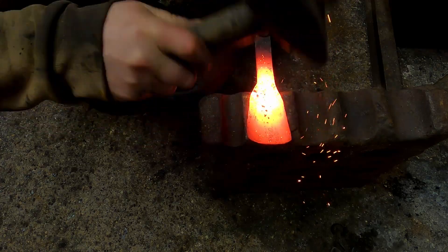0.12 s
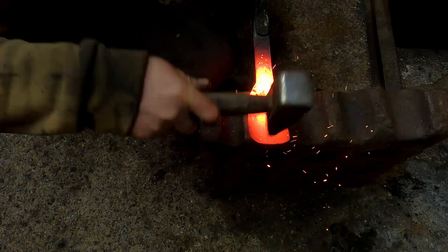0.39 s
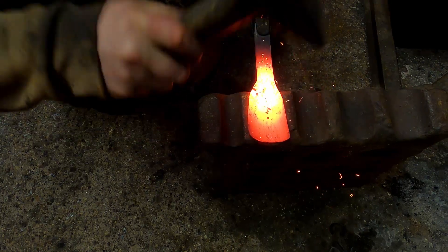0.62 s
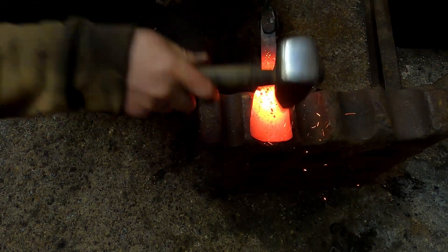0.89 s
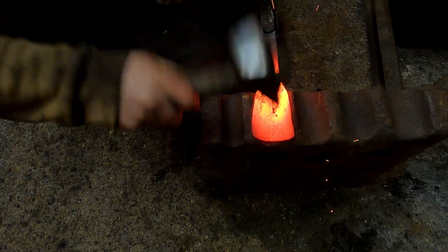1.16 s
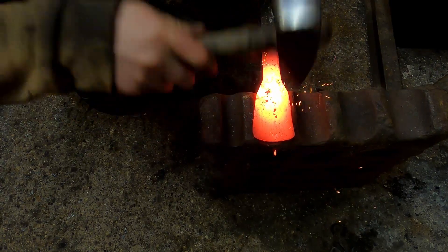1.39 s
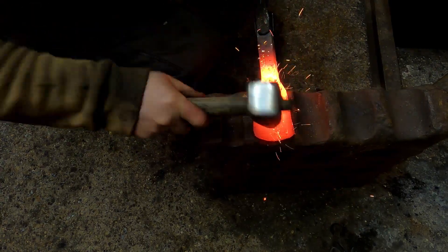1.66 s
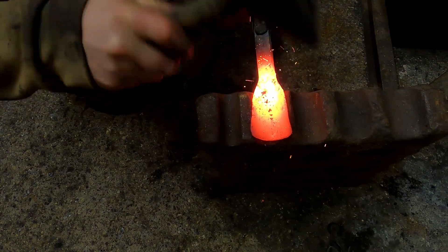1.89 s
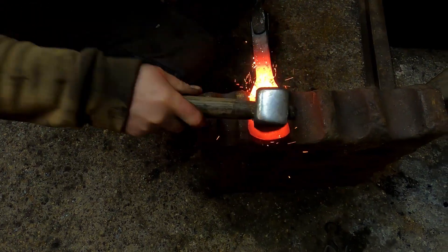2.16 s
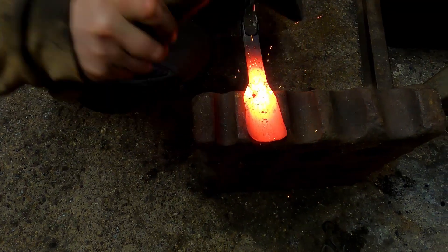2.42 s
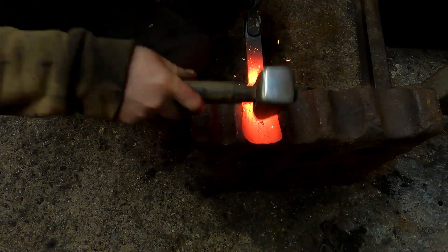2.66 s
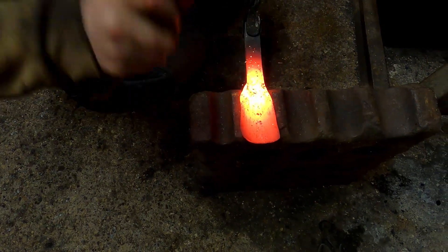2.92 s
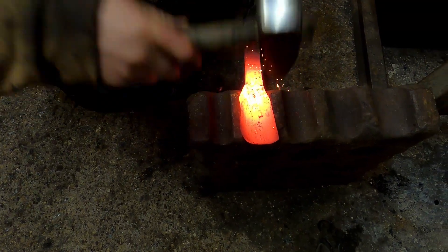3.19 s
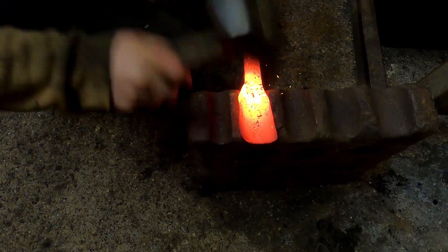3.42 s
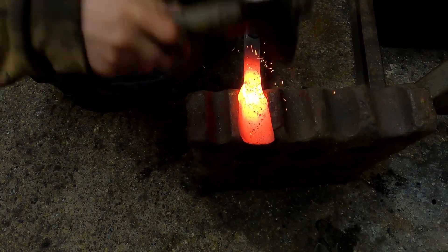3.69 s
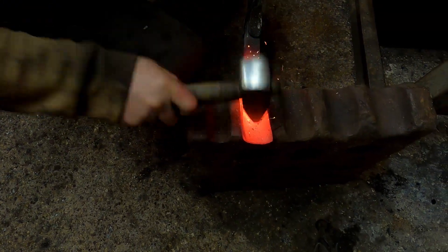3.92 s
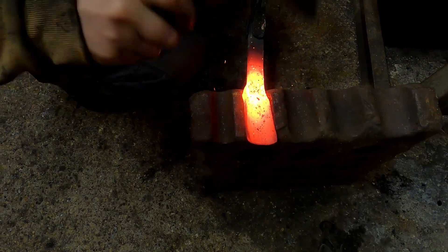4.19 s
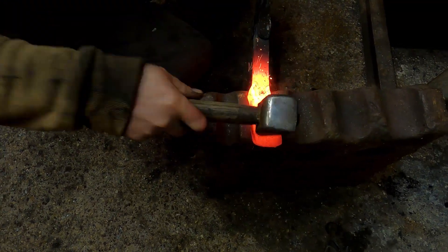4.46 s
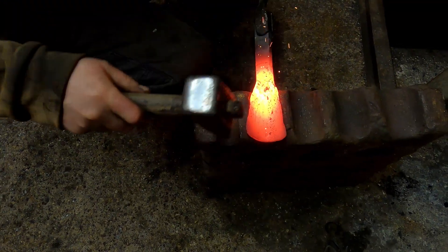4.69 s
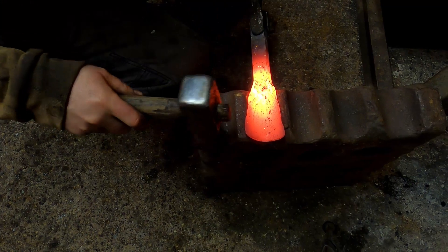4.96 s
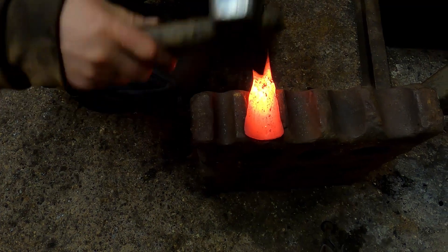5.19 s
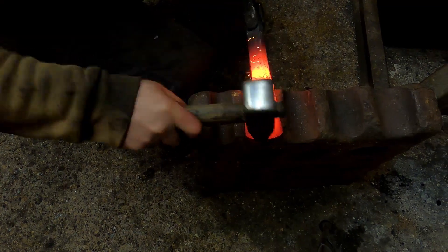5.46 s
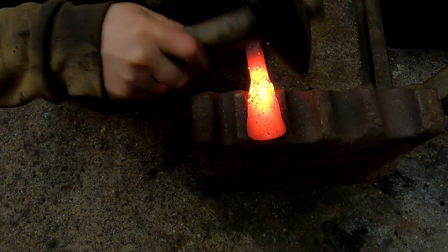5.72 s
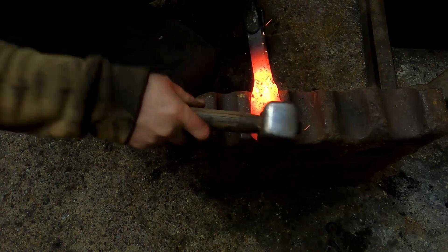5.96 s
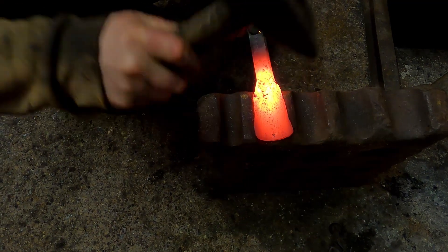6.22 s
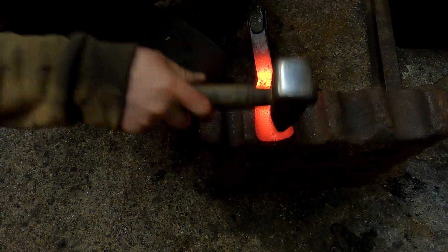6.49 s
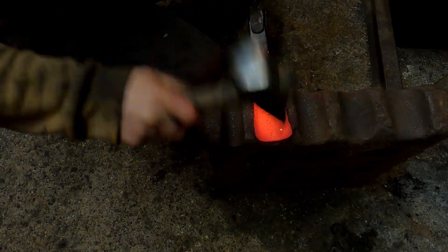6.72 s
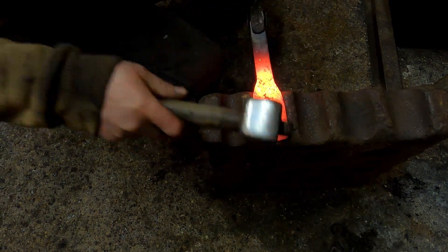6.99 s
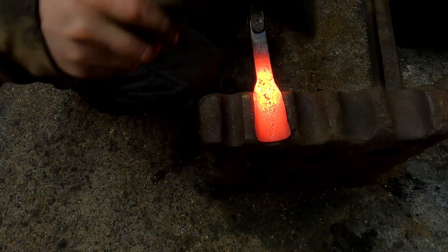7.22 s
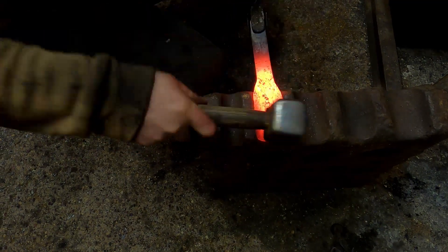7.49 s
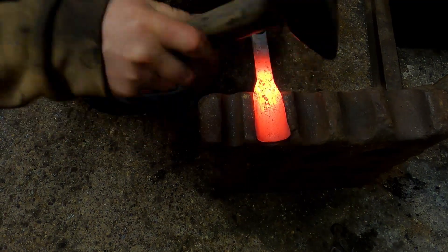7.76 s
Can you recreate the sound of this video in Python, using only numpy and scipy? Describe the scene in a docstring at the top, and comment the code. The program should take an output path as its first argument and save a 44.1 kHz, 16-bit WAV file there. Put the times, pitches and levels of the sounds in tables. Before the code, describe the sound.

A hand hammer beats hot iron on a steel block in a steady run of hard cracks, dull thumps and short, thin ringing.

```python
"""A hand hammer beats a hot iron bar on a steel block in a small workshop. Each blow is a short crack (pulse and
damped clank), a dull thump, a deep boom of stand and room and thin ringing of block and hammer head (damped sines),
and a wash off the walls (decaying noise). Once the hammer rests on bare steel. Scale patters as random grains,
the bar ticks and scrapes (small cracks, rough noise), over a low rumble and a faint hiss (filtered noise).
The recorder ducks its gain just after each loud peak."""
import sys
import numpy as np
from scipy import signal
from scipy.fft import rfft, irfft, next_fast_len
from scipy.io import wavfile
from scipy.ndimage import uniform_filter1d, map_coordinates

SR = 44100
rng = np.random.default_rng(int(sys.argv[2]) if len(sys.argv) > 2 else 0)


def digitize_waveform(pressure):
    """Quantize a signal to 16-bit integers and store it at the path in sys.argv[1].

    Rows of a 2-D input are taken as channels; values are limited to [-1, 1].
    """
    field = np.atleast_2d(pressure).T
    bounded = np.clip(field, -1, 1)
    quanta = np.round(bounded * 32767).astype(np.int16)
    wavfile.write(sys.argv[1], SR, quanta)


def convert_level_to_amplitude(level_db):
    """Map a level in decibels to its linear amplitude factor."""
    exponent = np.asarray(level_db, float) / 20
    return 10 ** exponent


N = 347058  # length in samples

# full blows on the iron: start_s, force_db, clank_db (over the crack's pulse),
# tilt_db (brightness per octave above 3 kHz), hammer_db (ring of the hammer head)
BLOWS = [(0.0549, -.5, 4.5, -5, -62), (0.485, 1.5, -7.5, 3, -46.5), (0.922, 6, 4, -2, -40.5),
         (1.3869, 4, 0, 4, -51), (1.8279, 0.5, 3.5, -2, -51), (2.2783, -1, 8.5, -5, -60.5),
         (2.7483, 0, -13, -5.5, -62), (3.2147, 2, -8.5, 0, -59), (3.663, 2, 1, -1, -59),
         (4.124, 2, 3, -1, -60.5), (4.5834, 4.5, 2, 2, -61.5), (5.6464, -3, 4.5, -2, -50.5),
         (6.0786, 2, 2, -2.5, -59.5), (6.512, -1, -2, 2, -67), (6.9483, -1, 13, -.5, -54.5),
         (7.6258, 3.5, -10.5, 1.5, -55.5)]
# ringing modes of the steel block: pitch_hz, relative level_db, t60_s
BLOCK_MODES = [(1008, -6, .6), (1157, -10, .3), (1265, -6, .22), (1518, -14, .25), (1712, -4, .35),
               (1895, -4, .42), (2089, -20, .3), (2305, -14, .25), (2482, 1, .32), (3031, 2, .36),
               (3150, 1, .32), (3655, -4, .22), (3876, -1, .27), (4360, -18, .2), (4581, -15, .22),
               (5001, -20, .2), (5728, -23, .36), (8043, -27, .3)]
# the stereo image opens up while the pre-echo of the blows weakens: time_s, side_db, pre_echo_db
WIDTH = [(4.3, -27, -6), (4.9, -4.5, -13.5), (6.9, 4.5, -13)]


def unit(x):
    """Scaled to rms 1."""
    return x / np.sqrt(np.mean(x ** 2) + 1e-20)


def along(points, hz):
    """(Hz, value) points read on a log frequency axis."""
    f, value = np.transpose(points)
    return np.interp(np.log(hz + 1), np.log(f + 1), value)


def coloured(x, points):
    """x through a zero-phase filter that follows the (Hz, dB) points."""
    n = x.shape[-1]
    size = next_fast_len(n + 8192)
    gain = convert_level_to_amplitude(along(points, np.fft.rfftfreq(size, 1 / SR)))
    return irfft(rfft(x, size) * gain, size)[..., :n]


def causal(points, size):
    """Minimum-phase impulse response of the (Hz, dB) points, by folding the cepstrum."""
    gain = convert_level_to_amplitude(along(points, np.fft.rfftfreq(size, 1 / SR)))
    cepstrum = irfft(np.log(gain + 1e-6))
    cepstrum[1:size // 2] *= 2
    cepstrum[size // 2 + 1:] = 0
    return irfft(np.exp(rfft(cepstrum)))


def ringing(modes, t, spread_db, way=1, beat=0):
    """Damped sines at new strengths, drawn twice: as both ports hear them, and as they differ between ports."""
    hz, db, t60 = np.transpose(modes)[:, :, None]
    db = db + spread_db * rng.standard_normal((2, len(hz), 1))
    # the common part starts at phase 0, the difference at random phases
    phase = np.array([[[0]], [[1]]]) * rng.uniform(0, 2 * np.pi, hz.shape)
    # close mode pairs beat
    beat_cycles = rng.uniform(4.5, 24, db.shape) * t + rng.random(db.shape)
    throb = 1 + beat * np.sin(2 * np.pi * beat_cycles)
    decay = convert_level_to_amplitude(db - 60 * t / t60)
    first_swing = np.reshape(way, (-1, 1))
    return (first_swing * throb * decay * np.sin(2 * np.pi * hz * t + phase)).sum(1)


def softened(modes, soft_db):
    """The modes, weaker by soft_db for each octave above the first: a softer contact wakes less treble."""
    lowest_hz = modes[0][0]
    return [(f, level - soft_db * np.log2(f / lowest_hz), t60) for f, level, t60 in modes]


def scatter(x, t60):
    """x spread over a short decaying noise burst of energy 1, like a cluster of close reflections, drawn twice."""
    t = np.arange(SR // 20) / SR
    burst = rng.standard_normal((2, len(t))) * convert_level_to_amplitude(-60 * t / t60)
    return signal.fftconvolve(x[None], burst / np.linalg.norm(burst[0]), axes=1)


def walls(x, gap):
    """Two fresh diffuse tails that build up after a gap (s); each frequency dies at its own speed."""
    # decay of the room: pitch_hz, t60_s
    wall_decay = [(300, 0.66), (900, 0.47), (2500, 0.45), (6000, 0.33), (12000, 0.21)]
    # tone of the reflections: pitch_hz, relative level_db
    wall_colour = [(250, -0.5), (1000, 4.5), (3000, -4), (6000, -2.5), (12000, 1)]
    n = np.shape(x)[-1]
    hz, t, bins = signal.stft(rng.standard_normal((2, n)), SR, nperseg=256)
    fade = convert_level_to_amplitude(-60 * t / along(wall_decay, hz)[:, None])
    tail = signal.istft(bins * fade, SR, nperseg=256)[1][:, :n]
    # the tail is uneven in tone: random gain per narrow band, drawn anew each time
    bands = np.arange(600, 12000, 90.1)
    ripple = np.transpose([bands, 2.8 * rng.standard_normal(len(bands))])
    tail = coloured(coloured(tail, wall_colour), [(500, 0), *ripple])
    tail = tail * (1 - np.exp(-(np.arange(n) / SR / gap) ** 2))
    return signal.fftconvolve(x[None], tail / np.linalg.norm(tail[0]), axes=1)[:, :n]


def add(track, s, x):
    """Mixes x into the track at time s."""
    track[:, round(s * SR):][:, :x.shape[-1]] += x


def rumble():
    """A low unsteady drone and a faint hiss fill the workshop, both filtered noise."""
    # drone spectrum: pitch_hz, relative level_db (per Hz)
    drone_colour = [(15, -51), (25, -22.5), (76, 5.5), (96, 2), (119, -9), (140, -12.5), (160, 2),
                    (181, -3), (195, 2), (227, -7), (248, -21.5), (340, -16.5), (900, -44.5), (1170, -63),
                    (1980, -120)]
    # hiss spectrum: pitch_hz, relative level_db (per Hz)
    hiss_colour = [(300, -20), (600, 0), (3000, -8), (8000, -22), (14000, -38)]
    rate = 6  # random level points per second, joined by a smooth curve
    waver = map_coordinates(rng.standard_normal(int(N * rate / SR) + 4), [np.arange(N) * rate / SR])
    drone = unit(coloured(rng.standard_normal((2, N)), drone_colour))
    hiss = unit(coloured(rng.standard_normal((2, N)), hiss_colour))
    return convert_level_to_amplitude(-45.5 + 4.2 * waver) * drone + convert_level_to_amplitude(-74) * hiss


def flakes():
    """Scale knocked off the iron patters down after every full blow: sparse random grains that die away."""
    # grain spectrum: pitch_hz, relative level_db (per Hz)
    flake_colour = [(1500, -44), (3000, -5), (6000, 0.5), (10000, -9), (15000, -21.5)]
    since = np.arange(N) / SR - np.transpose(BLOWS)[0][:, None]
    shower = (convert_level_to_amplitude(-60 * np.abs(since) / 0.99) * (since > 0)).sum(0)
    falls = rng.random((2, N)) < 900 / SR  # 900 grains per second
    size = convert_level_to_amplitude(2 * rng.exponential(size=(2, N))) * rng.standard_normal((2, N))
    return convert_level_to_amplitude(-62.5) * shower * unit(coloured(falls * size, flake_colour))


def crack(t, clank_hz, clank_db, tilt_db):
    """Steel meets metal: a sharp pulse and a quickly damped clank, together scaled to peak 1."""
    # pulse spectrum: pitch_hz, relative level_db (per Hz)
    pulse_colour = [(200, -28), (600, -13), (790, -17.5), (1010, -10.5), (1350, -13.5), (2000, -12.5),
                    (3250, -4), (4660, -10), (6300, -14), (7700, -23), (9500, -24), (12000, -40),
                    (14500, -53.5), (17000, -63)]
    tilted = [(f, db + tilt_db * max(np.log2(f / 3000), 0)) for f, db in pulse_colour]
    pulse = np.pad(causal(tilted, size=1024), (0, len(t) - 1024))
    clank_shape = convert_level_to_amplitude(-60 * t / 0.0036) * (1 - np.exp(-t / 0.00073))
    clank = np.sin(2 * np.pi * clank_hz * t) * clank_shape
    both = pulse / np.abs(pulse).max() + convert_level_to_amplitude(clank_db) * clank
    return both / np.abs(both).max()


def bar_ticks():
    """The bar taps the block now and then: a small crack, its reflections, and mostly the lowest block modes."""
    # bar touching the block: start_s, tap_db (crack peak), ring_db
    ticks = [(1.7824, -29.5, -57), (3.0074, -39, -65), (3.1457, -36.5, -65), (4.007, -42.5, -70),
             (5.248, -32, -60), (5.5667, -43.5, -54), (6.7585, -38.5, -45.5)]
    out, t = np.zeros((2, N + SR)), np.arange(int(.3 * SR)) / SR
    for s, tap_db, ring_db in ticks:
        tap = convert_level_to_amplitude(tap_db) * crack(t, clank_hz=4630, clank_db=-11.5, tilt_db=4.0)
        add(out, s, scatter(tap, t60=0.033)[:, :len(t)])
        add(out, s, convert_level_to_amplitude(2.5) * walls(tap, gap=0.0045))
        add(out, s, convert_level_to_amplitude(ring_db) * ringing(softened(BLOCK_MODES, soft_db=19.5), t, spread_db=2.0))
    return out[:, :N]


def bar_scrapes():
    """The bar drags over the block: rough noise, and noise that sets the block modes singing."""
    # bar dragged over the block: full_s (full strength reached), held_s, level_db
    scrapes = [(4.84, .02, -60.5), (5.29, 0.084, -65), (5.57, .03, -61), (6.0, .03, -61.5),
               (6.79, .02, -69.5), (6.9, .01, -75.5), (7.54, .04, -60.5)]
    # scrape spectrum: pitch_hz, relative level_db (per Hz)
    scrape_colour = [(410, -50.5), (700, -25.5), (988, -4), (1820, -10.5), (1930, 1.5), (2690, -21),
                     (3470, -2), (4250, -11.5), (5020, -9), (10000, -30), (13000, -76.5), (22000, -120)]
    rise, fall = 120, 190  # dB per s
    t, now = np.arange(int(.3 * SR)) / SR, np.arange(N) / SR
    rough = rng.standard_normal((2, N)) * convert_level_to_amplitude(4.1 * rng.standard_normal(N))
    grit = coloured(rough, scrape_colour)
    block_ring = ringing(BLOCK_MODES, t, spread_db=1.5)
    singing = signal.fftconvolve(rng.standard_normal((2, N)), block_ring, axes=1)[:, :N]
    rub = unit(unit(grit) + .35 * unit(singing))
    s, held, db = np.transpose(scrapes)[:, :, None]
    drag_db = db - rise * np.maximum(s - now, 0) - fall * np.maximum(now - s - held, 0)
    return convert_level_to_amplitude(drag_db).sum(0) * rub


def strike(s, force_db, clank_hz, clank_db, tilt_db, boom_db, thump_db, block_db, hammer_db, block):
    """Crack, thump and rings arrive directly or off the walls; the boom follows a moment later. Starts .1 s early."""
    # stand and room booming: pitch_hz, relative level_db, t60_s
    boom_modes = [(70.9, -6, 0.38), (87.22, -11, 0.49), (122.1, -19, 0.41), (130.95, -7.5, 0.32),
                  (162.9, -15.5, 0.49), (181.8, -6, 0.29), (201.6, -17.5, 0.55), (205.9, -26, 0.63),
                  (237, -14, 0.47), (252, -32.5, 0.8), (267, -31, 0.17), (266, -27.5, 0.67),
                  (294.3, -29.5, 0.84), (316, -33, 0.51), (321, -10.5, 0.07), (367, -33, 0.61),
                  (343.4, -21.5, 0.36), (380, -24.5, 0.12), (435, -36, 0.47), (441, -28, 0.23),
                  (473, -32.5, 0.32)]
    # first swing of each boom mode: out (1) or in (-1)
    boom_way = [1, 1, -1, -1, -1, -1, 1, -1, -1, -1, -1, -1, -1, -1, -1, 1, 1, 1, 1, 1, 1]
    # the stand rocking on the floor: pitch_hz, relative level_db, t60_s
    sway_modes = [(43, -23.5, 0.56)]
    # hammer head: pitch_hz, relative level_db, t60_s
    hammer_modes = [(9405, 0, .45), (14595, -24, .35)]
    # dull part of a blow: pitch_hz, relative level_db (per Hz)
    thump_colour = [(100, -33.5), (250, -3.5), (450, 3), (620, -5.5), (800, -11.5), (1100, -19.5),
                    (2500, -47)]
    out, t, early = np.zeros((2, SR)), np.arange(int(.7 * SR)) / SR, .1

    hit = convert_level_to_amplitude(force_db) * crack(t, clank_hz, clank_db, tilt_db)
    add(out, early, hit * [[1], [0]])  # the direct crack reaches both ports alike
    add(out, early, convert_level_to_amplitude(-1.5) * scatter(hit, t60=0.018)[:, :len(t)])  # block face and bench reflect at once
    add(out, early, convert_level_to_amplitude(2.5) * walls(hit, gap=0.0036))

    thump = np.pad(causal(thump_colour, size=4096), (0, len(t) - 4096))
    add(out, early, convert_level_to_amplitude(thump_db) * walls(thump / np.linalg.norm(thump), gap=0.00061))

    rings = convert_level_to_amplitude(block_db) * ringing(block, t, spread_db=2, beat=.4)
    rings = rings + convert_level_to_amplitude(hammer_db) * ringing(hammer_modes, t, spread_db=1.5, beat=.45)
    add(out, early, rings + convert_level_to_amplitude(-6.5) * walls(rings[0], gap=.005))

    boom = ringing(boom_modes, t, spread_db=2.0, way=boom_way)
    sway = ringing(sway_modes, t, spread_db=1.0)
    add(out, early + .0035, convert_level_to_amplitude(boom_db) * (boom + sway))

    # the crack is smeared ahead of itself: a reversed noise burst in its colour
    pre_echo = scatter(hit[:400], t60=0.051)[:, SR // 25::-1]
    uneven = [(f, rng.normal(0, 6)) for f in range(500, 16000, 450)]  # strong in scattered bands
    pre_echo = coloured(pre_echo, uneven)
    when, _, pre_echo_db = np.transpose(WIDTH)
    add(out, early - pre_echo.shape[1] / SR, convert_level_to_amplitude(np.interp(s, when, pre_echo_db)) * pre_echo)
    return out


def blows():
    """All hammer blows: force drives boom and thump, a clanky blow thumps less, and soft iron damps block treble."""
    # the clank mostly climbs as the iron spreads thin: time_s, pitch_hz
    clank_pitch = [(0, 2610), (2.3, 3030), (4.6, 3700), (5.6, 3130), (6.1, 3490)]
    out = np.zeros((2, N + 2 * SR))
    iron_block = softened(BLOCK_MODES, soft_db=5)
    for s, force_db, clank_db, tilt_db, hammer_db in BLOWS:
        clank_hz = np.interp(s, *np.transpose(clank_pitch))
        boom_db = -5 + 0.38 * force_db
        thump_db = 2 + 0.87 * force_db - 0.44 * clank_db
        add(out, s, strike(s, force_db, clank_hz, clank_db, tilt_db, boom_db, thump_db,
                           block_db=-41.5, hammer_db=hammer_db, block=iron_block))
    # the hammer rests once on the bare block, light and dull; steel on steel wakes the upper modes more
    rest_s = 4.9736
    add(out, rest_s, strike(rest_s, force_db=-11.5, clank_hz=2720, clank_db=-7.5, tilt_db=-24, boom_db=-20,
                            thump_db=-1, block_db=-34, hammer_db=-58.5, block=softened(BLOCK_MODES, soft_db=-2)))
    return out[:, SR // 10:][:, :N]  # takes back the .1 s early start


def scene():
    """Two close microphone ports: the left hears a little later and louder, and each catches its own reflections."""
    # what differs between the ports: pitch_hz, level_db (before the WIDTH gain)
    side_colour = [(60, -27), (400, -24.5), (1300, -14), (2400, -11.5), (8000, -5.5), (15000, 0)]
    mid, unlike = rumble() + flakes() + bar_ticks() + bar_scrapes() + blows()
    # the slope term shifts the ports in time, the last term in level
    side = coloured(unlike, side_colour) - .45 * np.gradient(mid) + .025 * mid
    when, side_db, _ = np.transpose(WIDTH)
    side = side * convert_level_to_amplitude(np.interp(np.arange(N) / SR, when, side_db))
    return np.array([mid + side, mid - side])


def roll_off(x):
    """The treble ends steeply here."""
    return signal.sosfilt(signal.butter(12, 16400, fs=SR, output="sos"), x)


def record(dry):
    """Gain control reacts just after a loud peak and recovers at a steady dB rate; the converter clips softly."""
    # the capsule sheds the deepest bass
    dry = signal.sosfilt(signal.butter(2, 24, "high", fs=SR, output="sos"), dry)
    envelope = np.abs(uniform_filter1d(np.abs(dry).max(0), 20))
    over_db = 20 * np.log10(envelope + 1e-9) + 10.5  # above a threshold of -10.5 dB
    # a running maximum against a ramp holds each peak, then lets go at 110 dB per s
    ramp_db = 110 * np.arange(N) / SR
    duck_db = np.maximum(np.maximum.accumulate(over_db + ramp_db) - ramp_db, 0)
    duck_db = np.pad(uniform_filter1d(duck_db, 60), (80, 0))[:N]  # smoothed, then 80 samples late
    x = dry * convert_level_to_amplitude(-duck_db)
    x = x / (1 + np.abs(x) ** 6) ** (1 / 6)
    x = coloured(x, [(13000, 0), (15800, -6), (16300, -60)])  # the very top is cut off
    return roll_off(x)


dry = scene()
out = record(dry)
digitize_waveform(out)
```